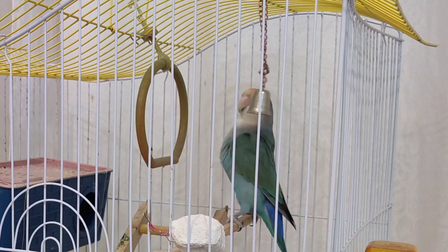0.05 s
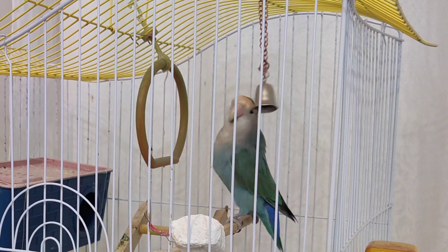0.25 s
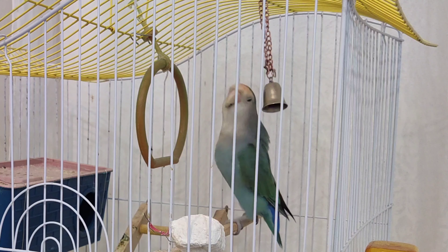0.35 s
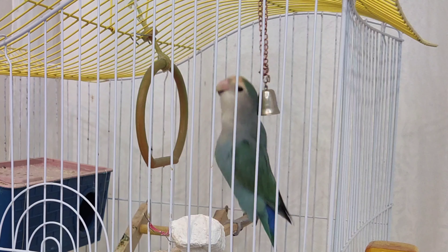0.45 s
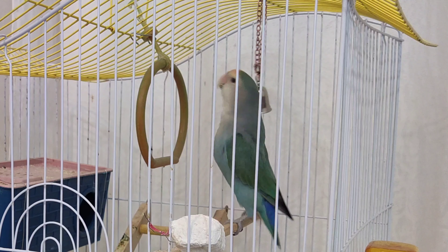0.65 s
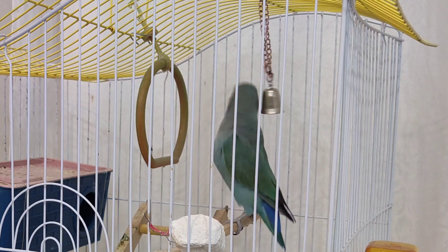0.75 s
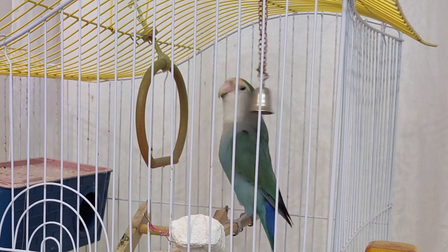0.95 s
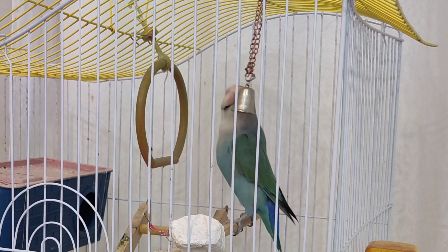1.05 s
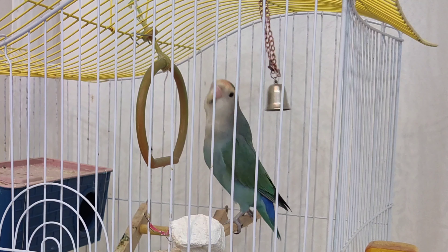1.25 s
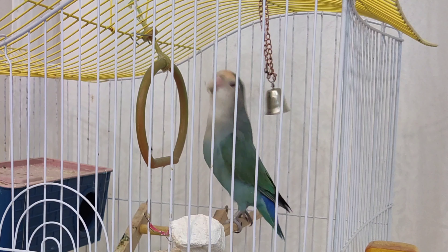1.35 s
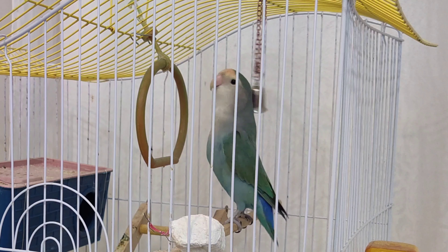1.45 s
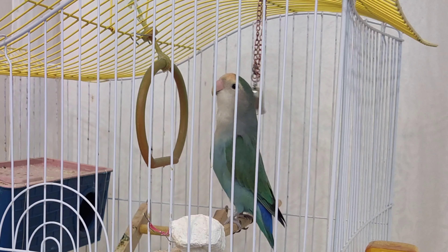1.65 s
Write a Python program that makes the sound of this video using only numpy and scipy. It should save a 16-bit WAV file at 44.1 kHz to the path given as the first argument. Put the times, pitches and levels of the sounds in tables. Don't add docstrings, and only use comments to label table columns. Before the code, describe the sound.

A small caged parrot gives two short bursts of shrill chirps and squawks in a quiet room

```python
import sys
import numpy as np
from scipy import signal
from scipy.fft import rfft, irfft
from scipy.io import wavfile

SR = 44100
rng = np.random.default_rng(int(sys.argv[2]) if len(sys.argv) > 2 else 0)


def inscribe(sig):
    pcm = np.round(np.clip(np.atleast_2d(sig).T, -1, 1) * 32767)
    wavfile.write(sys.argv[1], SR, pcm.astype(np.int16))


def natural_amplitude(level_db):
    exponent = np.asarray(level_db, float) / 20
    return 10 ** exponent


N = 74970
EDGE_S = .002


def in_time(rows, t):
    s, *columns = np.transpose(rows)
    return [np.interp(t, s, c) for c in columns]


def at_hz(points, hz):
    table_hz, value = np.transpose(points)
    return np.interp(np.log(hz), np.log(table_hz), value)


def filtered(x, order, hz, kind):
    return signal.sosfilt(signal.butter(order, hz, kind, fs=SR, output="sos"), x)


def wander(rate_hz, size):
    slow = filtered(rng.standard_normal(size + 2000), 2, rate_hz, "low")[2000:]
    return slow / np.sqrt(rate_hz * 2.22 / SR)


def octaves():
    edges = 22 * 2 ** np.arange(0, 9.6, .5)
    white = rng.standard_normal((2, 2, N))
    return [(np.sqrt(low * high), filtered(white[k % 2], 2, [low, high], "band"))
            for k, (low, high) in enumerate(zip(edges, edges[1:]))]


def room_hum():
    # f/Hz, level/dB
    hum_colour = [(15, -75), (25, -47.5), (119, -4), (1000, -12.5), (2700, -13), (3170, -13.5), (6730, -28),
                  (7300, -28), (15500, -39.5)]
    hum_db, likeness = -65, 0.18
    edge_hz, above_edge_db = 6600, -11
    out = np.zeros((2, N))
    for hz, (mid, side) in octaves():
        shared = np.sqrt(1 + likeness) * mid
        apart = np.sqrt(1 - likeness) * side * [[1], [-1]]
        out += natural_amplitude(at_hz(hum_colour, hz)) * (shared + apart)
    low = filtered(out, 8, edge_hz, "low")
    out = low + natural_amplitude(above_edge_db) * (out - low)
    return natural_amplitude(hum_db) * out / out.std()


def toy_bell():
    # t/s, low mode level/dB, high mode level/dB
    strikes = [
        (0, -66.5, -75),
        (.617, -81, -71),
        (.697, -65.5, -86),
        (.781, -65, -62),
        (.885, -66.5, -89),
        (1.176, -56.5, -70),
        (1.644, -65.5, -68.5),
    ]
    mode_hz = (6528, 6827)
    mode_t60 = (.8, .55)
    touch_s, touch_t60_s = 1.39, .12
    t = np.arange(N) / SR
    stilled = np.maximum(t - touch_s, 0) / touch_t60_s
    out = np.zeros(N)
    for s, *levels in strikes:
        age = t - s
        for db, hz, t60 in zip(levels, mode_hz, mode_t60):
            decay = age / t60 + stilled * (s < touch_s)
            out += natural_amplitude(db - 60 * decay) * np.clip(age / EDGE_S, 0, 1) * np.sin(2 * np.pi * hz * age)
    return out


def note(rows, partials_db, voicing):
    # f/Hz, level/dB
    throat = [(700, 6.5), (1600, 5), (2400, -0.5), (3300, 5), (4900, -2), (6400, 4), (8000, -7),
              (12500, 2.5)]
    trill, sweep_hz, depth, wobble, breath_db, pan_db = voicing
    below_db = -8
    brighten = .12
    rasp_db, rasp_hz, rasp_width_hz = -15, 6130, 2200
    t = np.arange(N) / SR
    start, end = rows[0][0], rows[-1][0]
    hz, db, *rest = in_time(rows, t)
    half_db = rest[0] if rest else -33.5

    cycle = (.5 + trill * (t - start) + .035 * wander(60, N)) % 1
    pulse = 1 - np.clip(depth, 0, 1) * (1 - np.sin(np.pi * cycle) ** 5.6)
    hz = hz * (1 + wobble / 100 * wander(350, N)) - sweep_hz * np.cos(np.pi * cycle)
    phase = np.pi * np.cumsum(hz) / SR

    count = len(partials_db)
    multiples = np.arange(1, 2 * count + 0.5) / 2
    levels = np.interp(multiples, np.arange(count + 1), [2 * below_db, *partials_db])
    tone = np.zeros(N)
    for k, level in enumerate(levels, 1):
        partial_db = level + at_hz(throat, np.abs(k * hz / 2) + 1) + half_db * (k % 2)
        partial_db = partial_db + brighten * max(k / 2 - 1, 0) * (db - db.max())
        partial_db = partial_db + 1.1 * wander(200, N)
        tone += natural_amplitude(partial_db) * np.sin(k * phase) * (k * hz < .9 * SR)

    carrier = np.sin(2 * phase) + 0.1 * np.sin(4 * phase) + 0.014 * np.sin(8 * phase)
    breath = natural_amplitude(breath_db) * wander(1800, N) * carrier
    rasp = wander(rasp_width_hz, N) * np.sin(2 * np.pi * rasp_hz * t)
    breath = breath + natural_amplitude(breath_db + rasp_db) * pulse * rasp
    edge = np.clip((t - start) / EDGE_S, 0, 1) * np.clip((end - t) / EDGE_S / 3 + 1, 0, 1)
    return natural_amplitude(db) * edge * pulse * (tone + pulse * breath) * natural_amplitude([[pan_db / 2], [-pan_db / 2]])


def bird():
    # t/s, f/Hz, level/dB and, where they sound, half-pitch partials level/dB
    rise_1 = [(.163, 1603, -43.5, -24.5), (.168, 1594, -43.5, -27.5), (.175, 1498, -38.5, -6.5),
              (.185, 1597, -39.5, -9.5), (.192, 1598, -35, -9), (.200, 1549, -38.5, -28.5),
              (.208, 1685, -38, -22.5), (.216, 1725, -32.5, -25), (.223, 1660, -45.5, -26)]
    chirp = [(0.2539, 3500, -20.5, -40), (0.2574, 3943, -16.5, -37.5), (0.26, 4110, -7, -41),
             (0.2609, 4127, -24.5, -34.5), (.267, 4205, -9, -6), (.280, 3913, -17, -7),
             (0.293, 3785, -23, 4.5), (0.314, 3671, -26.5, 3.5), (0.323, 3600, -46, 5)]
    whistle = [(.422, 3230, -29, -27.5), (0.430, 3138, -20, -37.5), (0.443, 3091, -18, -45.5),
               (0.457, 3050, -18.5, -48.5), (.462, 2950, -22.5, -48.5), (0.473, 2895, -17, -54),
               (0.479, 2703, -18.5, -54.5), (0.492, 2677, -22, -45), (0.511, 2522, -18, -37)]
    rise_2 = [(0.943, 1404, -45.5), (0.95, 1591, -43), (0.965, 1638, -41), (0.978, 1703, -32),
              (.982, 1855, -31), (0.99, 1626, -40.5)]
    flip = [(0.977, 2236, -36.5), (0.989, 2650, -28.5), (0.993, 2815, -29), (0.997, 3097, -23.5),
            (1.003, 3170, -51)]
    rattle = [(1.042, 3300, -26), (1.044, 2823, -28), (1.051, 2730, -32.5), (1.057, 2457, -21.5),
              (1.066, 2376, -19.5), (1.070, 2188, -31), (1.076, 1818, -29.5)]
    droop = [(1.078, 3412, -24, 7), (1.087, 3216, -49.5, 20), (1.097, 3073, -23, -5.5),
             (1.107, 2967, -35.5, -3)]
    squawk = [(1.191, 2095, -25.5), (1.200, 2377, -26), (1.211, 2614, -26), (1.224, 2787, -25.5),
              (1.24, 2980, -25), (1.255, 2899, -23.5), (1.268, 2650, -29), (1.280, 2446, -25.5)]
    sigh = [(1.277, 1755, -24.5), (1.29, 1617, -34), (1.303, 1554, -34), (1.31, 1251, -40.5),
            (1.32, 1192, -35), (1.326, 1133, -63)]
    slide = [(0.394, 1818, -32, -6), (0.400, 1888, -38, -26.5), (0.407, 2038, -31, -31),
             (.415, 2725, -31, -17.5), (.421, 3237, -30, -29.5)]
    yelp = [(1.042, 2096, -43), (1.045, 2090, -30), (1.051, 2130, -42)]
    fade = [(.513, 2450, -25.5), (0.517, 2300, -24), (0.524, 2260, -42)]
    groan = [(1.282, 2375, -39), (1.294, 2151, -29.5), (1.307, 1982, -23), (1.314, 1960, -42)]
    rise_1_db = [-7, 3.5, -1.5, 0.5, -11.5, -14.5, -25.5, -23]
    chirp_db = [-3, -17.5, -39]
    whistle_db = [2.5, -22, -43, -38.5, -44]
    rise_2_db = [0, -5, -16, -19.5, -28]
    flip_db = [3, -14.5, -47, -56]
    rattle_db = [2.5, -14, -24]
    droop_db = [-3, -37]
    squawk_db = [5.5, -17.5, -39, -63]
    sigh_db = [-2, -14, -24]
    slide_db = [2.5, -13.5, -24.5, -34.5, -39.5, -40.5, -44]
    yelp_db = [-15, 2.5, -14.5]
    # trill/Hz, sweep in each pulse/Hz, pulse depth/0-1, wobble/%, breath/dB, left-right/dB
    voicings = [(158.7, 2.9, 0.2, 1.2, -18, 0.5), (203, 10, 0.06, 0.42, -32.5, -0.5),
                (120, 5, .15, .7, -38, -0.5), (159, 7.1, 0.19, 0.25, -40, 1.5),
                (198.6, 69, 0.54, 1.3, -24, -5), (175, 79, 0.32, 2.553, -28.5, -0.5),
                (167, 18, 0.2, 0.98, -25, -0.5), (154, 620, 0.96, 3.5, -11, 1.5),
                (156, 14, 0.25, 0.64, -20, 1), (150, 20, 0.4, 0.7, -28, 2.7), (169, 20, .2, 1.5, -7, 1),
                (181, 15, .2, 1.9, -22, 1.1), (149.7, 180, 0.39, 2.93, -20.5, 0)]
    tracks = [rise_1, chirp, whistle, rise_2, flip, rattle, droop, squawk, sigh, slide, yelp, fade, groan]
    colours = [rise_1_db, chirp_db, whistle_db, rise_2_db, flip_db, rattle_db, droop_db, squawk_db,
               sigh_db, slide_db, yelp_db, chirp_db, chirp_db]
    return sum(note(*parts) for parts in zip(tracks, colours, voicings))


def air_puffs():
    # start t/s, end t/s
    spans = [
        (.254, .270),
        (.415, .434),
        (.416, .434),
        (.981, .998),
        (1.041, 1.10),
        (1.192, 1.208),
        (1.258, 1.325),
        (.47, .68),
        (1.12, 1.40),
    ]
    # centre f/Hz, half width/Hz, level/dB
    patches = [(7400, 1800, -48), (2857, 710, -32.5), (12270, 900, -54.5), (4340, 1500, -44.5),
               (13200, 600, -67), (4000, 220, -38.5), (12700, 1100, -67), (426, 290, -64.5),
               (435, 370, -64.5)]
    t = np.arange(N) / SR
    out = np.zeros(N)
    for (start, end), (hz, width_hz, db) in zip(spans, patches):
        edge = np.clip(np.minimum((t - start) / EDGE_S, (end - t) / 0.0042), 0, 1)
        out += natural_amplitude(db) * edge * wander(width_hz, N) * np.sin(2 * np.pi * hz * t)
    return out


def perch_knocks():
    # t/s, level/dB, f/Hz, t60/s
    knocks = [
        (.262, -30.5, 690, 0.015),
        (0.411, -87, 244, 0.11),
        (.498, -59.5, 175, 0.41),
        (0.779, -77, 192.6, 0.082),
        (1.070, -49.5, 699, .05),
        (1.168, -60.5, 167, 0.094),
        (1.516, -62, 258, 0.067),
        (1.639, -78.5, 180.6, .1),
    ]
    out, t = np.zeros(N), np.arange(N) / SR
    for s, db, hz, t60 in knocks:
        age = np.maximum(t - s, 0)
        ring = np.sin(2 * np.pi * hz * age) * (1 + 0.32 * wander(.4 * hz, N))
        out += natural_amplitude(db - 60 * age / t60) * np.clip(age / 0.0039, 0, 1) * ring
    return out


def near_pickup(cage):
    # f/Hz, phase/rad
    left_behind = [(1700, 1.47), (2900, 0.92), (3400, 0.12), (4100, 0.5), (5000, 1), (6200, 0.28),
                   (8200, 1.5), (12400, 1.1)]
    # f/Hz, level/dB
    left_db = [(2400, -1.5), (3300, -3), (4100, 0.5), (5500, -1)]
    wall_s, wall_db = .00165, -6.5
    hz = np.arange(N // 2 + 1) * SR / N + 1e-3
    lag = at_hz(left_behind, hz) * np.clip(hz / 1700, 0, 1)
    ports = np.array([natural_amplitude(at_hz(left_db, hz)) * np.exp(-1j * lag), np.ones_like(hz)])
    wall = 1 - natural_amplitude(wall_db) * np.exp(-2j * np.pi * hz * wall_s)
    return irfft(rfft(cage) * ports * wall, N)


def room_echo(x):
    # f/Hz, t60/s
    room_t60 = [(500, 0.36), (2500, 0.3), (6000, 0.33), (12000, 0.05)]
    late_db, early_db, early_t60_s, gap_s = -6, -6.5, 0.051, 0.004
    age = np.arange(SR // 2) / SR
    early = natural_amplitude(early_db - 60 * age / early_t60_s) / np.sqrt(early_t60_s)
    echo = np.zeros((2, len(age)))
    for hz, band in octaves():
        t60 = at_hz(room_t60, hz)
        late = natural_amplitude(late_db - 60 * age / t60) / np.sqrt(t60)
        echo += band[:, -len(age):] * (late + early)
    echo = echo * np.clip(age / gap_s - .5, 0, 1) * np.sqrt(2 * np.log(1000) / SR)
    return signal.fftconvolve(echo, x.mean(axis=0, keepdims=True), axes=1)[:, :N]


def scene():
    cage = filtered(bird(), 4, 620, "high") + air_puffs() + perch_knocks()
    cage = filtered(cage, 4, 130, "high")
    bell = toy_bell() * natural_amplitude([[.6], [-.6]])
    return near_pickup(cage) + room_echo(cage) + room_hum() + bell


def band_limit(x):
    return signal.sosfilt(signal.butter(12, 15780, fs=SR, output="sos"), x)


def record(dry):
    top_cut = signal.cheby2(10, 60, 15800, fs=SR, output="sos")
    mix = signal.sosfilt(top_cut, dry)
    return band_limit(mix)


dry = scene()
out = record(dry)
inscribe(out)
```